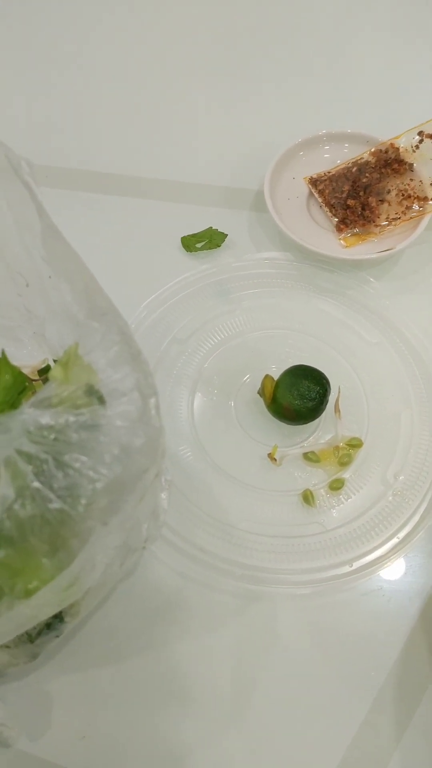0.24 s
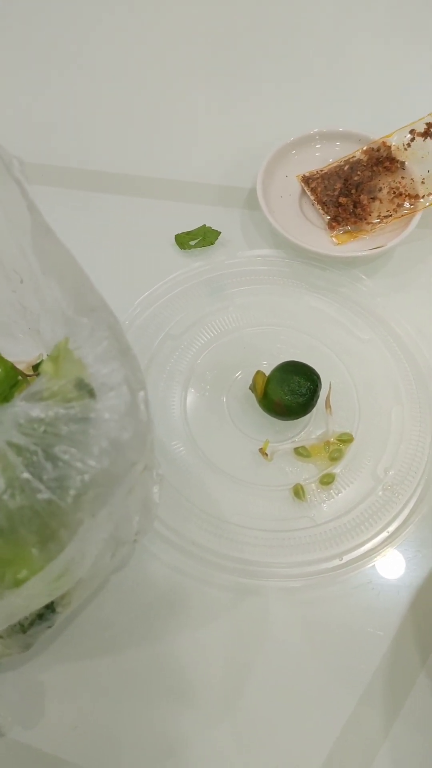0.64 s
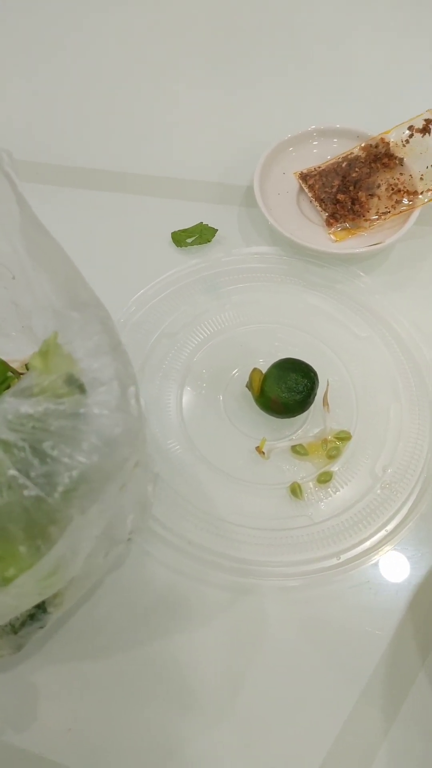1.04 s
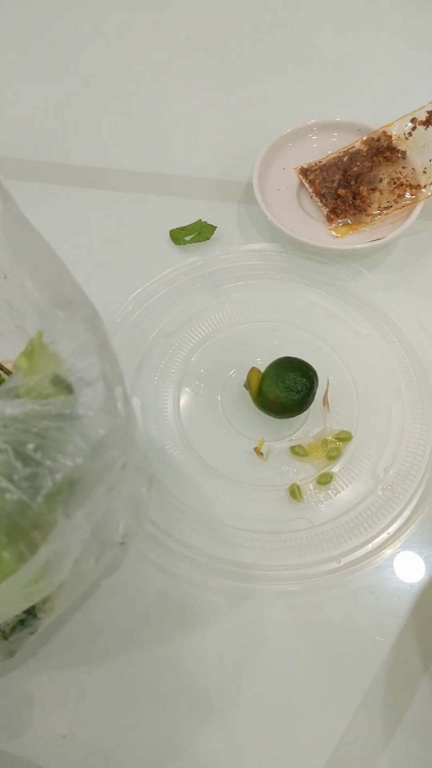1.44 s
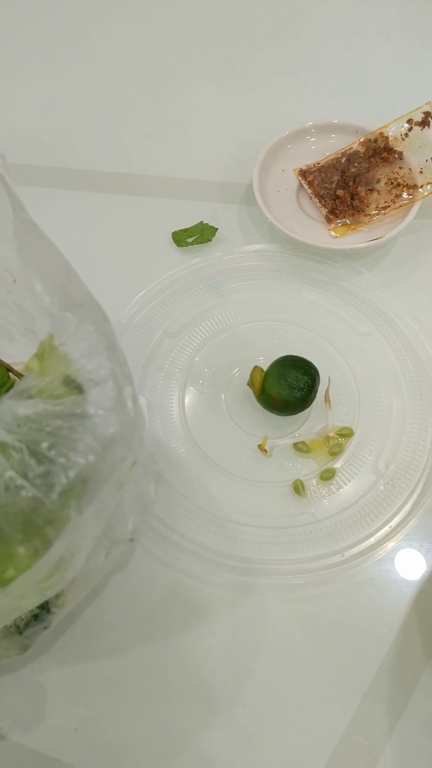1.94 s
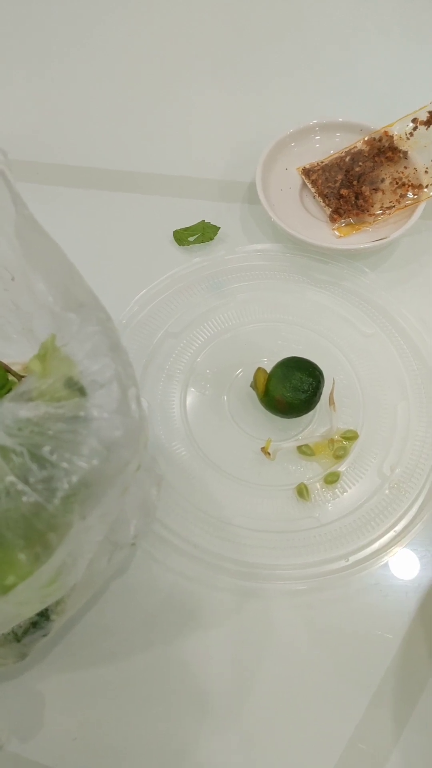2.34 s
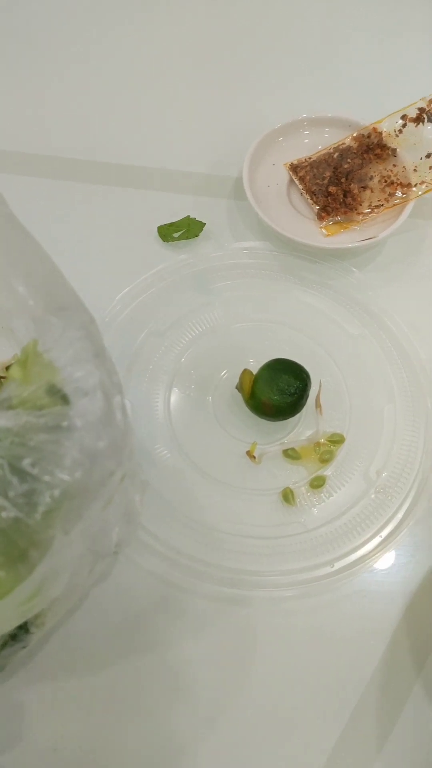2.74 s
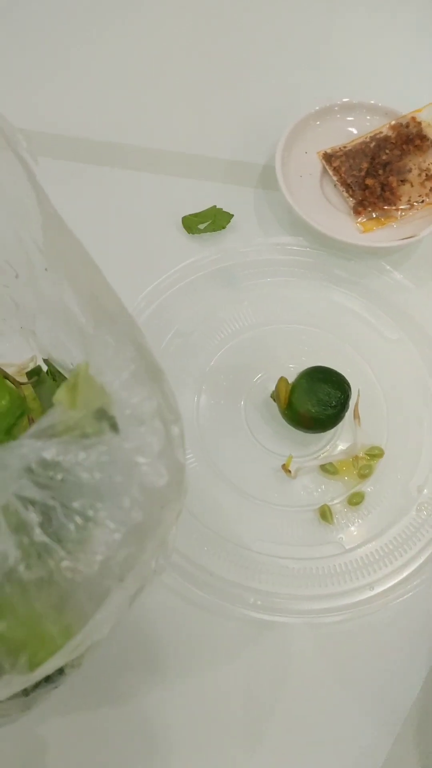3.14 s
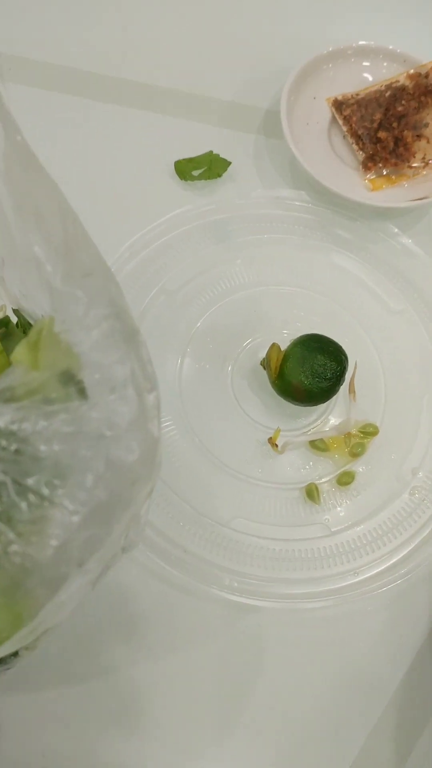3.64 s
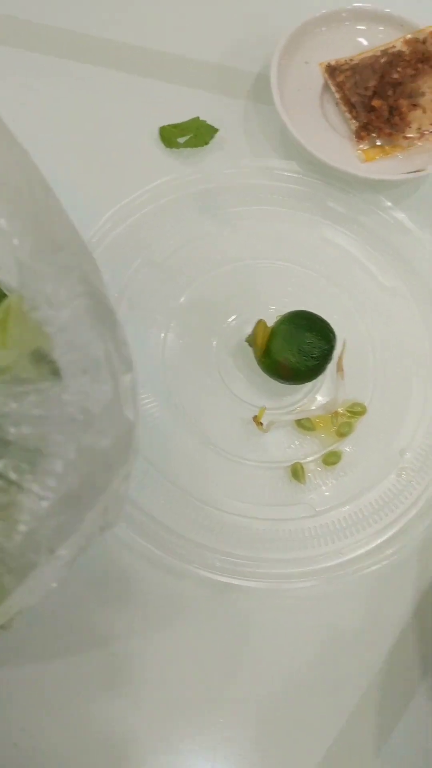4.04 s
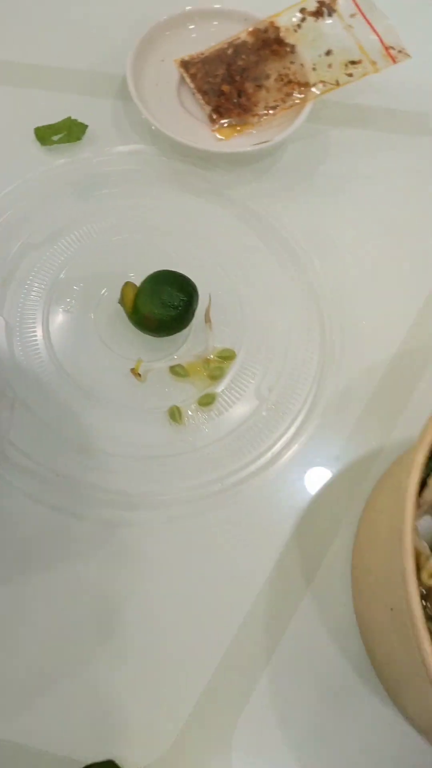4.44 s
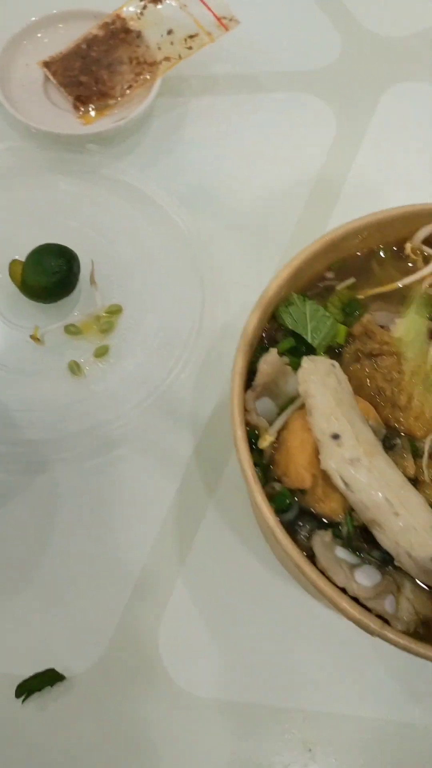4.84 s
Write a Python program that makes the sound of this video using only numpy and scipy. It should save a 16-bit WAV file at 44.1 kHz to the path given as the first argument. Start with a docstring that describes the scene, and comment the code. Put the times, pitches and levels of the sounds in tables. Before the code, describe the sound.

Thin plastic takeaway packaging snaps and ticks close by on a hard table, with soft thumps and sliding film over a low appliance hum.

```python
"""A small room, close to a hard table where takeaway food is set out; an appliance hums and hisses.
Thin plastic packaging snaps and ticks: short modes, a dull knock and a crack of pulses.
Weight thumps the table's low modes, and a plastic bag slides away as swelling friction noise.
A full paper bowl is pushed in with a few taps, over scuffing grains and table rumble.
Dense room echoes follow the handling; coloured noise and steady tones make the appliance."""
import sys
import numpy as np
from scipy import signal
from scipy.fft import rfft, irfft, next_fast_len
from scipy.io import wavfile
from scipy.ndimage import uniform_filter1d

SR = 44100
rng = np.random.default_rng(int(sys.argv[2]) if len(sys.argv) > 2 else 0)


def dump_mix(stems):
    """Bounce the given channels to the path in sys.argv[1] as a 16-bit WAV at rate SR."""
    frames = np.atleast_2d(stems).T  # one column per channel
    limited = np.clip(frames, -1, 1)  # hard clip at full scale
    pcm = np.round(limited * 32767).astype(np.int16)
    wavfile.write(sys.argv[1], SR, pcm)


N = 223840
TIME = np.arange(N) / SR
EVENT_N = SR // 2   # samples in one short event
EVENT_TIME = TIME[:EVENT_N]

# Snaps and taps of packaging close to the microphone.
# Each row: start in seconds, main mode level in dB, main mode in Hz, second mode level in dB, second mode in Hz,
# knock level in dB, crack level in dB, crack tilt in dB per octave, extra room send in dB, left over right in dB.
# Second mode, knock and crack levels are relative to the main mode.
PACKAGING_CLICKS = [ (0.3179, -34, 1000, -8, 1770, -2, -12, 1, 3, 0),
                    (0.3203, -18, 1110, -9, 1850, -7.5, 1, 0.2, -1.5, -4.5),
                    (0.3212, -25.5, 2100, 4, 3130, -8, -21, 6, 2.5, 5),
                    (0.7286, -20.5, 1130, -18.5, 2850, -16, -17, 1.5, -4, -7.5),
                    (0.7532, -34, 1110, -20, 1750, -2, -2.5, 2.5, 1, -4),
                    (0.753, -33.5, 2240, 2.5, 2800, -20, -12, -3, 3, 0),
                    (1.432, -44.5, 1820, -4, 2670, -16, 4, 5, -5, -5),
                    (1.496, -44, 1110, -5, 1650, -18, -1, 4.5, 1.5, -5),
                    (2.1865, -24.5, 1150, -3.5, 1770, -3, 1.5, 1, 2, 0),
                    (2.1906, -24, 756, -1, 1070, 4, -2.5, -3, 3.5, -8),
                    (2.1932, -24.5, 1310, -6, 980, -5, -14, 2, 2.5, -8),
                    (2.202, -23.5, 940, -1, 1500, -10, -8, -1.5, 1, -1),
                    (2.2181, -34.5, 810, -8, 1100, 1, -16, 2, -3, 0),
                    (2.2367, -32.5, 900, -11, 680, -7, -20, -2, 3, 0),
                    (2.2590, -38, 780, -3, 1450, -3, -16, -2, -2, -2),
                    (2.3248, -39, 1060, -11, 1550, 8, -5, -2, -1, -2),
                    (2.3755, -17, 1227, -1, 1675, -11.5, -4.5, -0.5, -2.5, -3),
                    (2.5839, -39.5, 770, 0.5, 1073, 0, -5, -3, 5, -4),
                    (3.083, -48, 1506, -18, 2200, 8, 5, 4, -2, -6),
                    (3.0890, -44.5, 910, -23, 1307, 1, -2.5, 6, 4, -8),
                    (3.7069, -37.5, 627, -2, 960, 8.5, -23, 1, 5, -4),
                    (3.714, -29, 850, -1.5, 1240, -5, -15, -1.5, 2, 2),
                    (3.7255, -31, 1220, -21, 1620, -15, -18, -7, -1, -13),
                    (4.3160, -31, 796, -1, 1120, -3.5, -1.5, 3, 4, -6.5),
                    (4.3440, -46, 900, -15, 1330, -1, 7, 3, 0, -9),
                    (4.3777, -24, 572, -4, 885, 2, 0.5, -7, 4, -1.5),
                    (4.52, -18, 996, -5, 1520, -5.5, -6.5, -4, -1.5, -3),
                    (4.7586, -33, 1203, -1, 1790, -15, -6, 1, 3, -3),
                    (4.882, -40.5, 830, -2.5, 1215, -7, 0, 7, -5, 1),
                    (4.885, -39.5, 940, -7, 1920, -14, -8, -3, -3, -6), ]
# Colour of the crack before its tilt. Each row: frequency in Hz, relative level in dB per Hz.
CRACK_COLOUR = [(200, -24), (900, 4.5), (2000, 5.5), (3200, 3.5), (4000, 0.5), (4800, -9), (5500, -9.5),
                (6500, -14.5), (7800, -25.5), (11000, -30.5), (16000, -50)]
KNOCK_HZ, KNOCK_T60_S = 393, 0.0071
RING_CYCLES = 17.3   # swings of the main mode in which a flexed patch falls by 60 dB
CLICK_ROOM_DB = -7.5   # basic share of each click that reaches the walls

# The ladder of modes of a stiff rim. Each row: frequency in Hz, level in dB, 60 dB decay time in seconds.
RIM_LADDER = [(337, -33, 0.02), (516, -33.5, 0.0053), (1290, -31, 0.019), (1850, -34.5, 0.019),
              (2250, -34, .014), (3000, -32, 0.016), (3870, -32.5, 0.01), (5550, -34, 0.011)]
RIM_SNAP_S = 3.8491   # the rim flicks free

# Weight landing on the table. Each row: start in seconds, boom gain in dB, deep thud gain in dB.
TABLE_THUMPS = [(2.191, -24.5, -46), (2.251, -32, -64), (2.285, -38, -71), (3.088, -30.5, -66),
                (3.115, -52, -69), (3.727, -37, -45), (3.851, -39.5, -66), (4.315, -37.5, -44),
                (4.523, -36, -66)]
# Low modes of the table top. Each row: frequency in Hz, relative level in dB, 60 dB decay time in seconds.
TABLE_TOP_MODES = [(211.6, 0.5, 0.11), (238.9, -3.5, 0.12), (368, -4.5, 0.049)]
THUD_HZ, THUD_T60_S = 105, 0.064

# Light crinkles of film.
# Each row: start in seconds, gain in dB, centre frequency in Hz, 60 dB decay time in seconds.
FILM_TICKS = [ (0.23, -49.5, 2140, 0.016), (0.935, -67, 6000, 0.023), (1.589, -61, 3360, 0.045),
              (1.771, -64, 4700, 0.06), (3.266, -49, 12500, 0.011), (3.272, -81, 13270, .12),
              (3.335, -62, 12300, .009), (4.206, -68, 4950, 0.013), (4.3178, -50, 5300, 0.006),
              (4.43, -61, 4960, .02), (4.594, -63, 4380, 0.011), (4.679, -60, 4380, 0.014),
              (4.899, -46, 2450, 0.0067), (5.039, -50, 1920, 0.036), ]

# The full bowl is pushed along.
# Each row: start in seconds, length before release in seconds, table rumble in dB, grain level in dB.
BOWL_PUSHES = [(3.702, 0.2, -56.5, -90), (4.32, 0.44, -64.5, -68), (4.542, 0.15, -62, -70)]
PUSH_ATTACK_S, PUSH_RELEASE_S = 0.023, 0.1
# Colour of the catching grains. Each row: frequency in Hz, relative level in dB per Hz.
SCUFF_SPECTRUM = [(200, -17), (600, 3), (1000, 2), (1700, 5), (2500, -20), (4000, -4), (6000, -18),
                  (8000, -50), (15000, -50)]

# Strokes of film sliding over the table.
# Each row: middle in seconds, length in seconds between the points at 1/e of the height, height in dB.
FILM_STROKES = [(0.034, 0.61, -4), (0.804, 0.65, -5.5), (1.472, 0.27, -0.5), (2.382, 0.3, -3),
                (2.925, 0.61, -0.5), (3.702, 0.58, 2), (4.11, 0.14, -9), (4.363, 0.35, 0.5),
                (4.743, 0.47, 0)]
STROKE_HISS_DB, STROKE_SIZZLE_DB = -66, -83   # added by a stroke of 0 dB at its height
REST_HISS_DB, REST_SIZZLE_DB = -75, -92.5   # between strokes
# Colour of the sliding hiss. Each row: frequency in Hz, relative level in dB per Hz.
HISS_SPECTRUM = [(600, -1.5), (1500, -2.5), (3000, 8), (4500, -5), (5800, -3), (7000, -11.5), (9000, -24),
                 (15000, -22)]
# Colour of the fine sizzle. Each row: frequency in Hz, relative level in dB per Hz.
SIZZLE_SPECTRUM = [(4000, -11), (7000, -1.5), (9500, -1), (11000, -6), (13000, -18), (16000, -11.5)]

# Decay of the small room. Each row: frequency in Hz, 60 dB decay time in seconds.
ROOM_DECAY = [(100, 0.23), (300, 0.53), (1000, 0.61), (3000, 0.8), (7000, 0.58), (15000, 0.2)]
# Tone of the room's echo. Each row: frequency in Hz, relative level in dB.
ROOM_TONE = [(100, 1), (300, 5.5), (550, 6.5), (850, 10), (1300, 3), (2500, 3), (6000, 1.5), (15000, -3)]
# How alike diffuse sound is in the two channels. Each row: frequency in Hz, left-right correlation.
CHANNEL_LIKENESS = [(30, 0.31), (150, 1), (300, 0.8), (600, 0.31), (1200, 0.084), (3000, 0.14), (6000, 0),
                    (15000, 0)]

# Colour of the moving air. Each row: frequency in Hz, relative level in dB per Hz.
AIR_SPECTRUM = [(15, -72), (25, -51), (87, -27), (119, -47), (144, -14), (216, -0.5), (243, 2), (350, -6),
                (393, -12), (535, -13), (578, -15), (802, -21), (1230, -23.5), (1700, -27), (2500, -42),
                (3250, -60), (5500, -120)]
AIR_DB = -54.5   # steady moving air, before panning
# Steady tones of the appliance. Each row: frequency in Hz, rms level in dB before panning.
HUM_TONES = [(156.1, -64), (242.2, -58), (275.5, -64.5), (516.8, -88.5), (576, -71.5)]
# Narrow rushing resonances of the fan.
# Each row: centre in Hz, distance in Hz at which the gain halves, level in dB before rush and panning.
FAN_RESONANCES = [(195.7, 24.6, -63.5), (246, 24, -69.5), (885, 170, -69.5), (1166, 160, -69),
                  (2935, 95, -75), (3260, 310, -66.5), (3356, 16, -72), (3580, 150, -74.5)]
# Change of the fan's high rush. Each row: time in seconds, added level in dB.
FAN_RUSH = [(0, 2), (2.0, 0), (2.6, 2), (4.1, 4.5), (5.08, 1.5)]
RUSH_ABOVE_HZ = 2000


def packaging(flutter_db=-17, scatter_db=-6.0, scatter_t60=0.0081, beamed_db=-16, knock_room_db=-3.0,
              crack_room_db=-5.0, rise_s=0.00032, low_cut_hz=150, port_lag_s=.00005):
    """A thin wall buckles: a crack, two short modes of the flexed patch and a dull knock of the whole box."""
    direct, to_room = np.zeros((2, 2, N))
    swell = 1 - np.exp(-EVENT_TIME / rise_s)   # the patch takes part of a cycle to get going
    plain_knock = mode(KNOCK_HZ, KNOCK_T60_S)
    for (s, db, main_hz, upper_db, upper_hz,
         knock_db, crack_db, tilt_db, room_db, pan_db) in PACKAGING_CLICKS:
        t60 = RING_CYCLES / main_hz
        modes = mode(main_hz, t60) + from_db(upper_db) * mode(upper_hz, t60)
        ring = band_pass(swell * modes, 150, 4000)
        knock = band_pass(from_db(knock_db) * plain_knock, 170, 6700)
        snap = from_db(crack_db) * crack(tilt_db)
        flutter = from_db(flutter_db) * weak_modes(main_hz, t60)
        add(direct, s, from_db(db) * (ring + knock + snap + flutter), pan_db)

        # the two strong modes beam towards the microphone, so less of them reaches the walls
        spread = from_db(beamed_db) * ring
        spread = spread + from_db(knock_room_db) * knock
        spread = spread + from_db(crack_room_db) * snap
        spread = spread + from_db(scatter_db) * weak_modes(main_hz, scatter_t60)
        add(to_room, s, from_db(db + CLICK_ROOM_DB + room_db) * spread, pan_db / 3)

    # the hands work a little to the right, so the left channel hears them later
    direct[0] = np.interp(TIME - port_lag_s, TIME, direct[0])
    # small light walls radiate no bass
    low_cut = signal.butter(2, low_cut_hz, "high", fs=SR, output="sos")
    return signal.sosfilt(low_cut, [direct, to_room])


def crack(tilt_db, first_pulse=1.0, shared=0.25, own=0.36, t60=0.022):
    """Plastic gives way: one sharp pulse and a spray of smaller ones, tilted by so many dB an octave."""
    spray = shared * burst(t60)[0] + own * burst(t60)   # in both channels alike, plus one's own
    spray[:, 0] += first_pulse
    tilted = [(hz, db + tilt_db * np.log2(hz)) for hz, db in CRACK_COLOUR]
    return coloured(spray, tilted)


def weak_modes(main_hz, t60, below=0.49, above=1.624):
    """Many weak modes of the wrinkled wall fill the gaps around the main one and radiate in all directions."""
    low_hz, high_hz = main_hz * below, main_hz * above
    level = np.sqrt(SR / 2 / (high_hz - low_hz))   # makes up for the narrow band
    return band_pass(burst(t60), low_hz, high_hz, order=3) * level


def burst(t60, rounds=4):
    """A dying spray of pulses in two channels, evened out so that no pitch stands out."""
    spray = rng.standard_normal((2, EVENT_N)) * fade(t60)
    for _ in range(rounds):
        flat = np.exp(1j * np.angle(rfft(spray)))   # keep the phase, level the spectrum
        spray = irfft(flat, EVENT_N) * np.sqrt(fade(4 * t60))
    return rms_one(spray) * np.sqrt(np.mean(fade(t60) ** 2))


def rim_snap(crack_db=-35, tilt_db=5, pan_db=-2, ring_room_db=-17, spray_room_db=-42,
             spray_low_hz=1900, spray_high_hz=5200, spray_t60=0.019):
    """A stiff plastic rim flicks free and rings in a ladder of modes; a bright spray goes to the walls."""
    direct, to_room = np.zeros((2, 2, N))
    ring = sum((-1) ** k * from_db(db) * mode(hz, t60) for k, (hz, db, t60) in enumerate(RIM_LADDER))
    noise = band_pass(rng.standard_normal((2, EVENT_N)), spray_low_hz, spray_high_hz, order=4)
    spray = rms_one(noise) * fade(spray_t60)
    add(direct, RIM_SNAP_S, ring + from_db(crack_db) * crack(tilt_db), pan_db)
    add(to_room, RIM_SNAP_S, from_db(ring_room_db) * ring + from_db(spray_room_db) * spray)
    return direct, to_room


def table_top(rise_s=0.0049, pan_db=-2.5):
    """Weight landing on the table sets its low modes swinging over a deep thud."""
    out = np.zeros((2, N))
    swell = (1 - np.exp(-EVENT_TIME / rise_s)) ** 2
    boom = sum(from_db(db) * mode(hz, t60) for hz, db, t60 in TABLE_TOP_MODES)
    thud = mode(THUD_HZ, THUD_T60_S)
    for s, boom_db, thud_db in TABLE_THUMPS:
        add(out, s, swell * (from_db(boom_db) * boom + from_db(thud_db) * thud), pan_db)
    return out


def crinkles(width=1.53, pan_db=0.0):
    """Small folds of film let go, each a short burst of noise around its own pitch."""
    out = np.zeros((2, N))
    for s, db, hz, t60 in FILM_TICKS:
        noise = band_pass(rng.standard_normal((2, EVENT_N)), hz / width, hz * width, order=1)
        fold = rms_one(noise) * fade(t60)
        soften = signal.butter(2, min(hz * 2.0, SR / 2 - 2000), fs=SR, output="sos")   # low-pass
        add(out, s, from_db(db) * signal.sosfilt(soften, fold), pan_db)
    return out


def scuffing(grains_per_s=300, spread_db=5.0, rumble_low_hz=160, rumble_high_hz=380):
    """During a push the foot of the bowl catches and slips in tiny uneven grains and the table rumbles."""
    slips = rng.random(N) < grains_per_s / SR
    sizes = from_db(spread_db * np.minimum(rng.exponential(1, N), 2)) * slips
    kicks = rng.choice([-1, 1], N) + 1.6 * rng.standard_normal((2, N))   # shared, plus each channel's own
    grains = rms_one(coloured(sizes * kicks, SCUFF_SPECTRUM))
    rumble = rms_one(band_pass(rng.standard_normal(N), rumble_low_hz, rumble_high_hz))
    out = np.zeros((2, N))
    for s, length, rumble_db, grain_db in BOWL_PUSHES:
        attack = np.clip((TIME - s) / PUSH_ATTACK_S, 0, 1)
        release = np.exp(-np.maximum(TIME - s - length, 0) / PUSH_RELEASE_S)
        out += attack * release * (from_db(rumble_db) * rumble + from_db(grain_db) * grains)
    return out


def sliding():
    """Friction noise: every stroke is a bell-shaped swell that raises hiss and fine sizzle together."""
    motion = sum(from_db(db) * np.exp(-(2 * (TIME - s) / length) ** 2) for s, length, db in FILM_STROKES)
    # rest and stroke add as powers
    hiss = np.hypot(from_db(REST_HISS_DB), from_db(STROKE_HISS_DB) * motion)
    sizzle = np.hypot(from_db(REST_SIZZLE_DB), from_db(STROKE_SIZZLE_DB) * motion)
    return hiss * wash(HISS_SPECTRUM) + sizzle * wash(SIZZLE_SPECTRUM)


def room(x, first_echo_s=0.004, build_s=0.0053, early_gain=0.46, early_s=0.041):
    """Dense wall echoes, evened across pitch and then toned, set in after milliseconds and die band by band."""
    t, hz = TIME[:SR], np.fft.rfftfreq(SR, 1 / SR)
    noise_bins = rfft(diffuse(np.ones_like)[:, :SR])
    centres, tail = np.geomspace(70, 16000, 10), 0
    for centre, weights in zip(centres, np.eye(len(centres))):
        band = irfft(noise_bins * np.interp(hz, centres, weights), SR)
        tail = tail + band * np.exp(-np.log(1000) * t / at_hz(ROOM_DECAY, centre))
    tail = tail * (1 + early_gain * np.exp(-t / early_s))   # near walls answer first and strongest

    bins = rfft(tail)
    even = bins / np.sqrt(uniform_filter1d(np.abs(bins) ** 2, size=60, axis=1))
    onset = np.clip((t - first_echo_s) / build_s, 0, 1)
    tail = irfft(even * from_db(at_hz(ROOM_TONE, hz)), SR) * onset
    return signal.fftconvolve(x, rms_one(tail) / np.sqrt(SR), axes=1)[:, :N]


def appliance(waver=0.032, pan_db=-0.8):
    """Moving air, fan resonances and motor tones whose phase wavers slightly (in radians)."""
    out = from_db(AIR_DB) * wash(AIR_SPECTRUM)
    rush_s, rush_level = np.transpose(FAN_RUSH)
    rush_db = np.interp(TIME, rush_s, rush_level)
    for centre, width, db in FAN_RESONANCES:
        resonance = diffuse(lambda hz: 1 / (1 + ((hz - centre) / width) ** 2))
        out += from_db(db + rush_db * (centre > RUSH_ABOVE_HZ)) * resonance
    for hz, db in HUM_TONES:
        drift = np.interp(TIME, np.linspace(0, TIME[-1], 30), rng.standard_normal(30))
        phase = 2 * np.pi * (hz * TIME + rng.random()) + waver * drift
        out += from_db(db) * np.sqrt(2) * np.sin(phase)
    return out * from_db([[pan_db / 2], [-pan_db / 2]])


def wash(spectrum):
    """Diffuse noise that follows a spectrum table."""
    return diffuse(lambda hz: from_db(at_hz(spectrum, hz)))


def diffuse(gain_at):
    """Stereo noise of rms 1 with a given spectrum, its channels alike mainly in the bass."""
    size = next_fast_len(N)
    hz = np.fft.rfftfreq(size, 1 / SR)
    mid, side = rfft(rng.standard_normal((2, size)))
    alike = np.clip(at_hz(CHANNEL_LIKENESS, hz), -.99, .99)
    both = np.sqrt(1 + alike) * mid + np.sqrt(1 - alike) * side * [[1], [-1]]
    return rms_one(irfft(both * gain_at(hz), size)[:, :N])


def coloured(x, spectrum):
    """Causal (minimum-phase) colouring that keeps the power of white noise."""
    size = x.shape[-1]
    hz = np.abs(np.fft.fftfreq(size, 1 / SR))
    gain = rms_one(from_db(at_hz(spectrum, hz)))
    response = np.exp(np.conj(signal.hilbert(np.log(gain))))
    return irfft(rfft(x) * response[:size // 2 + 1], size)


def band_pass(x, low_hz, high_hz, order=2):
    """A causal Butterworth band."""
    edges = [low_hz, min(high_hz, SR / 2 - 2000)]
    return signal.sosfilt(signal.butter(order, edges, "band", fs=SR, output="sos"), x)


def mode(hz, t60):
    """A struck mode: a dying sine."""
    return np.sin(2 * np.pi * hz * EVENT_TIME) * fade(t60)


def fade(t60):
    """An exponential decay by 60 dB in t60 seconds, half a second long."""
    return from_db(-60 * EVENT_TIME / t60)


def add(track, s, sound, pan_db=0):
    """Mix a sound into a stereo track at time s; pan_db is left over right."""
    i = round(s * SR)
    part = (sound * from_db([[pan_db / 2], [-pan_db / 2]]))[:, :N - i]
    track[:, i:i + part.shape[1]] += part


def at_hz(points, hz):
    """Read a table on a log-frequency axis."""
    f, value = np.transpose(points)
    return np.interp(np.log(np.maximum(hz, 1)), np.log(f), value)


def from_db(db):
    """Decibels to gain."""
    return 10 ** (np.asarray(db) / 20)


def rms_one(x):
    """Scale to unit rms."""
    return x / np.sqrt(np.mean(x ** 2) + 1e-20)


def scene(crinkle_room_db=-3, thump_room_db=-10):
    """Close handling, its echo in the room, the sliding film and the appliance behind."""
    clicks, to_room = np.add(packaging(), rim_snap())
    thumps = table_top()
    rustle = crinkles() + scuffing()
    echo = room(to_room + from_db(crinkle_room_db) * rustle + from_db(thump_room_db) * thumps)
    return clicks + rustle + thumps + echo + sliding() + appliance()


def record(dry, cutoff_hz=15750):
    """A steep elliptic low-pass cuts the top."""
    low_pass = signal.ellip(10, .1, 70, cutoff_hz, fs=SR, output="sos")   # ripple and stop band in dB
    return signal.sosfilt(low_pass, dry)


dry = scene()
out = record(dry)
dump_mix(out)
```